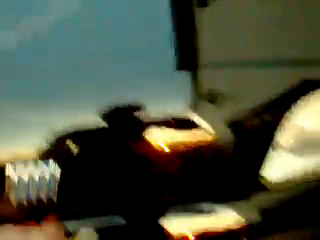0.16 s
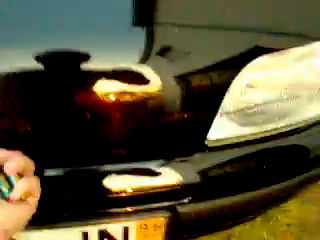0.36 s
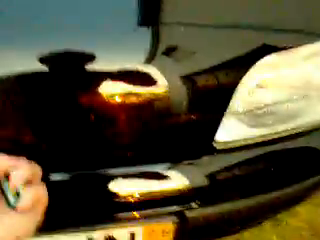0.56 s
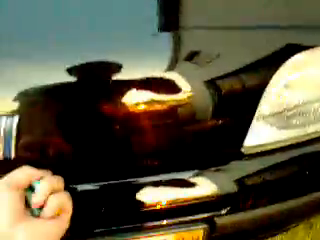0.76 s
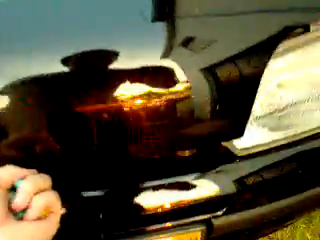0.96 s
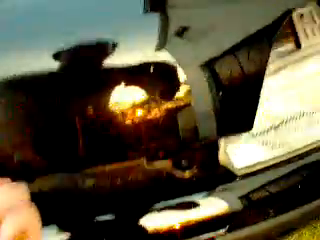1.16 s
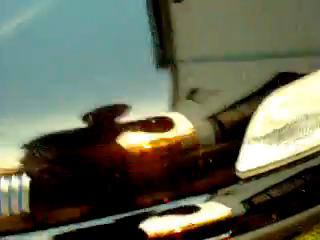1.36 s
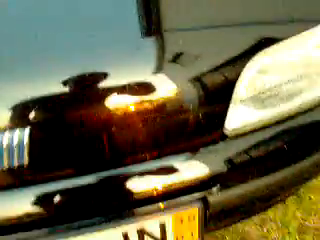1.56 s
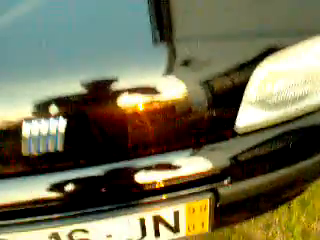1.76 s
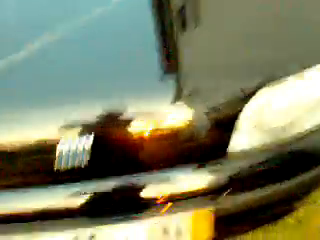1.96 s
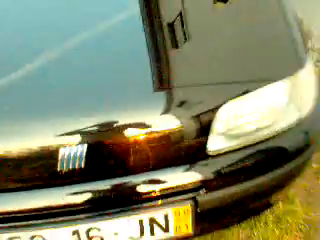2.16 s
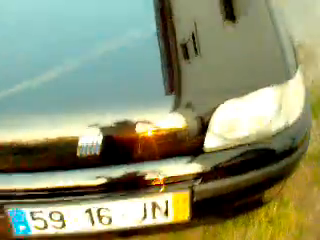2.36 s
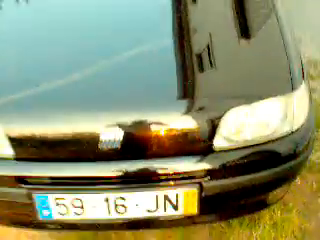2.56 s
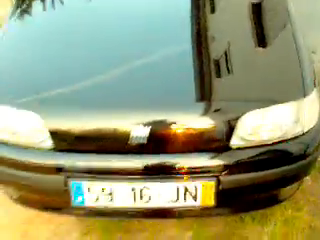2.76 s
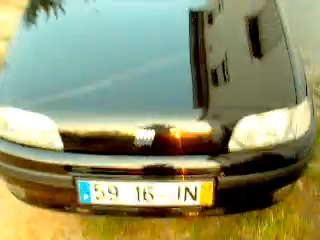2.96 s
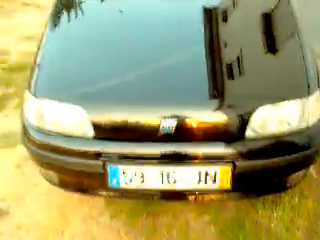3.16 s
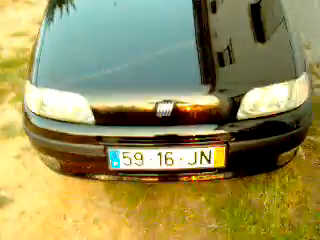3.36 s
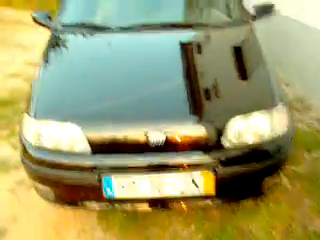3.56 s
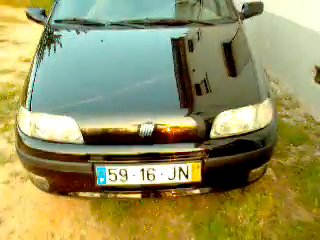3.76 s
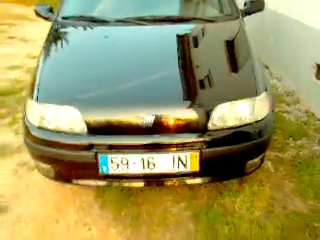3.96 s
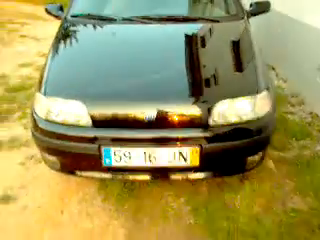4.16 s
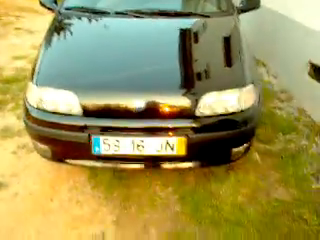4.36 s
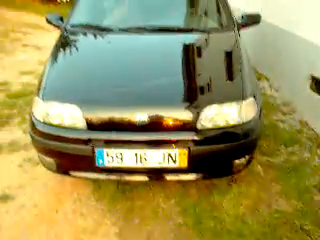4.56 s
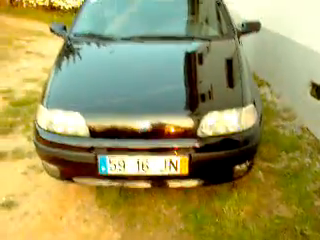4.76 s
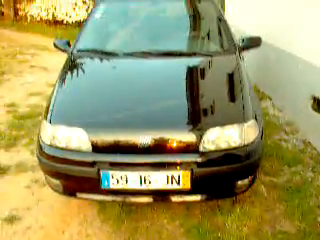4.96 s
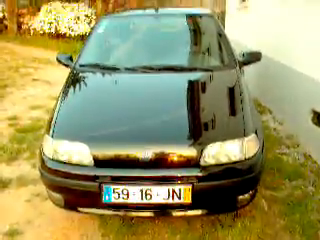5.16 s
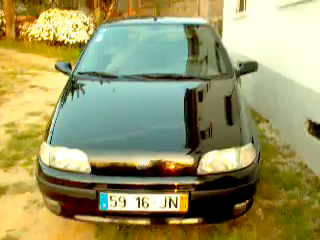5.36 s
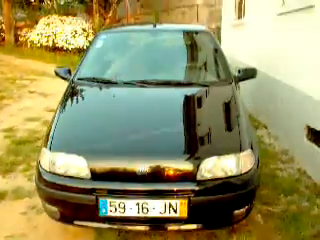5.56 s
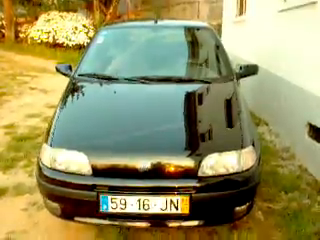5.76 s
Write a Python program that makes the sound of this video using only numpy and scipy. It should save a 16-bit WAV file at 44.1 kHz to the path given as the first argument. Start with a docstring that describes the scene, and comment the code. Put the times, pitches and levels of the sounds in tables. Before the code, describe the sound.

An outdoor scene heard through a small, band-limited hand-held microphone with steady dull hiss, low air rumble and sparse tiny electrical ticks. The start is nearly quiet, with a very faint touch of the bonnet. At about 0.5 s a light metallic knock comes from the latch, with a softer one near 0.75 s, leading straight into a heavy, hollow sheet-metal thud at 0.84 s. At 1.17 s a second deep thump lands, followed at 1.25 s by the loudest slam: bright, gritty latch clash, rattling car front, harshly overloaded. The lid bounces about five times, ever quicker and duller, settling by roughly 1.8 s. Rumble drops. A faint plastic click falls at 2.26 s; faint grass crackles around 2.5 to 3.3 s accompany small clicks, clustered near 3.3 s. At 4.54 s one loud, dry plastic snap cuts through. A last faint click comes at 5.6 s, over hiss.

```python
"""Outdoors, small hand-held camera microphone: a steel car bonnet is lowered onto its catch, knocks twice,
then is pressed shut with a double slam that overloads the input; the lid chatters to rest in quicker bounces.
Then the camera's case clicks in the hand, later once sharply; shoes step back over dry grass (swells of crackle).
Throughout lie a low outdoor rumble (coloured noise), narrow-band hiss and faint electrical ticks.
Bonnet, latch and case are sums of dying modes, with dying noise for their loose parts."""
import sys
import numpy as np
from scipy import signal
from scipy.fft import rfft, irfft, next_fast_len
from scipy.io import wavfile

SR = 44100
rng = np.random.default_rng(int(sys.argv[2]) if len(sys.argv) > 2 else 0)


def inscribe(sig):
    """Save sig as 16-bit PCM at rate SR to the path in sys.argv[1].

    A 1-D sig is mono; a 2-D sig holds one channel per row.
    Samples are clipped to [-1, 1] before scaling.
    """
    pcm = np.round(np.clip(np.atleast_2d(sig).T, -1, 1) * 32767)
    wavfile.write(sys.argv[1], SR, pcm.astype(np.int16))


N = 256662

# Blows on the bonnet, the first row only a faint hum of the panel at the very start [t/s, strength/dB, f
# excited by the edge/Hz, metal contact/dB, weight/dB, f excited by the weight/Hz, lid swing/dB]; metal, weight
# and swing are relative to strength
BLOWS = [(.005, -41.5, 226, -10, -4, 300, -9), (0.5174, -24.5, 330, 4.5, -1.5, 313, -23),
         (0.754, -26, 210, -37, -5.5, 300, -26), (.815, -29, 370, -27.5, -6, 450, -19),
         (0.8403, -8, 467, -4, -6, 380, -22), (1.104, -43, 606, 3.5, 2, 697, -8),
         (1.170, -8, 410, -12, 5, 202, -9.5), (1.246, 1, 980, 1, 3, 502, 8.5)]
# Modes of the bonnet panel [f/Hz, level/dB, t60/s]
PANEL_MODES = [(128, -13.5, 0.2), (157.3, 1.5, 0.23), (200.1, 2, 0.37), (233, -5.5, 0.57), (310, 0.5, 0.48),
               (332.8, -3.5, 0.37), (379.2, 1, 0.23), (420, -18.5, 0.58), (462.4, 2, 0.14),
               (516.5, -12, 0.41), (630, -4.5, 0.068), (738, -2, 0.074), (864, -8, 0.17), (995.5, -6, 0.14),
               (1067, -14, 0.093)]
# The whole lid bouncing on its rubber stops [f/Hz, level/dB, t60/s]
LID_MODES = [(30.33, -7, 0.4), (69.4, 2, 0.087)]
# Modes of the steel latch and its striker [f/Hz, level/dB, t60/s]
LATCH_MODES = [(1524, -3, 0.08), (1752, -4, 0.28), (2080, -13.5, 0.09), (2180, -13, 0.088),
               (2687, 6, 0.062), (3014, -15.5, 0.44), (3070, 8, 0.049), (3403, 12.5, 0.034),
               (3760, -8, 0.072), (3620, -9.5, 0.032)]
# Rattle of the car's front, relative spectrum [f/Hz, level/dB per Hz]
RATTLE_SPECTRUM = [(40, -2.5), (130, -2), (300, -0.5), (520, 2.5), (800, -11.5), (1050, -4), (1350, -33.5),
                   (2200, -29.5), (4000, -39)]
# How fast that rattle dies [f/Hz, t60/s]
RATTLE_DECAY = [(100, 0.44), (280, 0.53), (500, 0.16), (800, 0.24), (1800, 0.19), (4000, 0.14)]
# Grating of striker on latch, relative spectrum [f/Hz, level/dB per Hz]
CLASH_SPECTRUM = [(200, -23.5), (700, 20.5), (1050, 13.5), (1400, 9.5), (1850, 7.5), (2200, 1.5), (2800, 5),
                  (3500, 2.5), (4200, -4.5)]
# How fast the grating dies [f/Hz, t60/s]
CLASH_DECAY = [(700, 0.13), (4000, 0.13)]
# Clicks of the camera case in the hand [t/s, level/dB, brightest f/Hz]
CLICKS = [(2.263, -34.5, 610), (2.992, -36, 2100), (3.2841, -27, 1540), (3.332, -31, 1300),
          (3.3517, -24, 1100), (4.536, -6.5, 863), (5.610, -32, 2980)]
# Modes of the stiff plastic case [f/Hz, level/dB, t60/s]
CASE_MODES = [(510, -7, 0.024), (724, -4, 0.05), (893, -1, 0.01), (994, 3, 0.024), (1447, -1, 0.025),
              (1714, 3.5, 0.0093), (2020, 2, 0.0066), (2700, 4, 0.0087), (2930, -5, 0.0071),
              (3580, -1.5, 0.014)]
# Loose parts in the case, relative spectrum [f/Hz, level/dB per Hz]
BUZZ_SPECTRUM = [(150, -26), (400, -18), (850, 4.5), (1300, -9), (2000, -2.5), (4000, -21.5)]
# Shoes on soil and dry grass [t of the middle/s, level/dB, half length/s, brightest f/Hz]
SCUFFS = [(2.55, -53.5, 0.63, 544), (2.774, -43, 0.014, 2600), (2.88, -47, 0.031, 1020),
          (3.003, -52, 0.072, 540), (3.326, -39, 0.0088, 1050)]
# Dry grass, relative spectrum [f/Hz, level/dB per Hz]
GRASS_SPECTRUM = [(200, -1), (500, 2), (1050, -9), (1500, -15), (2900, -5), (4000, -13)]
# The clearest electrical ticks of the recorder [t/s]; fainter ones fall at random
CLEAR_TICKS = [0.186, .44, 1.91, 2.487, 3.116, 3.641, 4.17, 4.986, 5.232]
# Course of air and handling rumble on the microphone, before a common lift [t/s, level/dB]
RUMBLE_COURSE = [(0, -39.5), (1.2, -34.5), (2.2, -46), (5.8, -48)]
# That rumble, relative spectrum [f/Hz, level/dB per Hz]
RUMBLE_SPECTRUM = [(8, 8.5), (25, 4), (55, 6.5), (90, -2), (140, -10), (300, -16), (700, -41),
                   (2000, -39.5)]
# Preamplifier hiss, relative spectrum [f/Hz, level/dB per Hz]
HISS_SPECTRUM = [(30, 5.5), (300, 4), (600, 2.5), (1200, 0), (2500, 0), (4100, -1.5)]

# The lid's weight follows its edge: later and with less metal in it
FOLLOW_S, FOLLOW_METAL_DB = .014, -6.5
SWING_LAG_S = .03  # from a blow until the lid bottoms on its rubber stops
RATTLE_DB, RATTLE_PER_METAL = -1, 0.35  # rattle re strength; dB more for each dB of metal contact
# The bounces after the last blow
BOUNCE_S, BOUNCE_SHRINK = .048, .84  # first flight, each flight over the one before
BOUNCE_DB, BOUNCE_FADE_DB, BOUNCE_FADE_POWER = -6.5, 11.5, 2.43  # first, loss by the last, how late it comes
BOUNCE_METAL_DB, BOUNCE_METAL_FADE_DB = 0.5, 29.5  # metal contact of the first, its loss by the last
BOUNCE_HZ, BOUNCE_SWING_DB = 163.5, -10  # most excited frequency, lid swing re strength
# The camera case, levels re the click
GIVE_S, GIVE_DB = .006, -24.5  # it gives a little before it snaps
CRACK_DB, CRACK_HZ = -5, 1920  # its seam cracks with every snap
CHATTER_S, CHATTER_DB, CHATTER_HZ = .0053, -18, 3000  # then its parts chatter: spacing, level, middle pitch
RUB_DB, RUB_S, RUB_LAG_S = -22, 0.014, 0.0098  # the hand rubs around each click: level, half length, lag
TICK_DB, FAINT_TICK_DB = -27.5, -28.5
BAND_HZ, TOP_HZ = 4070, 15900  # upper edges: of the narrow band, and after the second clipping


def bonnet():
    """Each blow lands edge first, then with the lid's weight, and swings the lid; the last one bounces."""
    out = np.zeros(N)
    t = np.arange(SR * 3 // 4) / SR
    rise = 1 - np.exp(-t / 0.0005)
    # the first loud swing drains quickly into the car body
    shape = rise * amp(5.1 * np.exp(-t / 0.019) - 1.5)
    swing = sum(amp(db - 60 * t / t60) * np.sin(2 * np.pi * hz * t) for hz, db, t60 in LID_MODES)
    for s, db, edge_hz, metal_db, weight_db, weight_hz, swing_db in BLOWS:
        edge = contact(db, edge_hz, metal_db, t)
        weight = contact(db + weight_db, weight_hz, metal_db + FOLLOW_METAL_DB, t)
        add(out, s, shape * edge)
        add(out, s + FOLLOW_S, shape * weight)
        add(out, s + SWING_LAG_S, shape * amp(db + swing_db) * swing)
    for s, db, metal_db in bounces(count=5):
        landing = contact(db, BOUNCE_HZ, metal_db, t)
        add(out, s, shape * (landing + amp(db + BOUNCE_SWING_DB) * swing))
    return out


def contact(db, centre_hz, metal_db, t):
    """One contact rings the panel, shakes the front of the car and clashes the latch."""
    panel = ring(PANEL_MODES, centre_hz, focus_db=14.5, octaves=0.22, t=t)
    rattle_db = RATTLE_DB + RATTLE_PER_METAL * metal_db
    rattle = amp(rattle_db) * dying_noise(RATTLE_SPECTRUM, RATTLE_DECAY, t)
    # the striker meets the latch at a new spot each time, and grates as it does
    steel = ring(LATCH_MODES, rng.uniform(2000, 3800), focus_db=-2.5, octaves=0.17, t=t)
    grating = dying_noise(CLASH_SPECTRUM, CLASH_DECAY, t)
    clash = amp(metal_db) * (amp(-12) * steel + amp(-1) * grating)
    return amp(db) * (panel + rattle + clash)


def bounces(count):
    """Rows (t/s, strength/dB, metal/dB): the latched lid bounces ever faster and more softly."""
    k = np.arange(count)
    when = BLOWS[-1][0] + np.cumsum(BOUNCE_S * BOUNCE_SHRINK ** k)
    spent = (k / (count - 1)) ** BOUNCE_FADE_POWER
    strength_db = BOUNCE_DB - BOUNCE_FADE_DB * spent
    metal_db = BOUNCE_METAL_DB - BOUNCE_METAL_FADE_DB * spent
    return zip(when, strength_db, metal_db)


def case_clicks(count=3):
    """Under the rubbing hand the case gives, snaps, and chatters a few times."""
    out = np.zeros(N)
    t = np.arange(SR // 6) / SR
    around = t - t.mean()
    for s, db, centre_hz in CLICKS:
        add(out, s - GIVE_S, amp(db + GIVE_DB) * snap(centre_hz, t))
        crack = amp(CRACK_DB) * snap(CRACK_HZ, t)
        add(out, s, amp(db) * (snap(centre_hz, t) + crack))
        for k in range(count):
            chatter_hz = CHATTER_HZ * 2 ** rng.normal(0, 0.69)  # spread in octaves
            add(out, s + (k + 1) * CHATTER_S, amp(db + CHATTER_DB) * snap(chatter_hz, t))
        rub = np.exp(-.5 * (around / RUB_S) ** 2) * noise(BUZZ_SPECTRUM, len(t))
        add(out, s + RUB_LAG_S + around[0], amp(db + RUB_DB) * rub)
    return out


def snap(centre_hz, t):
    """Stiff plastic: short modes and a faint buzzing tail."""
    modes = ring(CASE_MODES, centre_hz, focus_db=16, octaves=0.25, t=t)
    return modes + amp(-6.5 - 60 * t / 0.039) * noise(BUZZ_SPECTRUM, len(t))


def steps():
    """Soft swells of crackle: dull where the sole meets soil, bright where it brushes stalks."""
    out = np.zeros(N)
    t = np.arange(-SR // 2, SR // 2) / SR
    for s, db, length, centre_hz in SCUFFS:
        # about 2000 random impulses a second
        stalks = rng.standard_normal(len(t)) * (rng.random(len(t)) < 2000 / SR)

        def grass(hz):
            bump = np.exp(-.5 * (np.log2((hz + 1) / centre_hz) / 0.28) ** 2)
            return amp(along(GRASS_SPECTRUM, hz) + 12.5 * bump) * (hz < BAND_HZ)

        crackle = unit(filtered(stalks, grass))
        swell = np.exp(-.5 * (t / length) ** 2)
        add(out, s + t[0], amp(db) * swell * crackle)
    return out


def ticks(count=8):
    """Small voltage steps in the recorder that leak away within a few milliseconds."""
    out = np.zeros(N)
    t = np.arange(SR // 50) / SR
    step = np.clip(1 - t / 0.0051, 0, 1) ** 2
    for s in CLEAR_TICKS:
        add(out, s, amp(TICK_DB) * step)
    for s in rng.uniform(0, N / SR, count):
        add(out, s, amp(FAINT_TICK_DB) * step)
    return out


def background():
    """Air rumbling on the microphone, and even preamplifier hiss: two coloured noises."""
    rumble_db = np.interp(np.arange(N) / SR, *np.transpose(RUMBLE_COURSE)) + 3.0
    rumble = amp(rumble_db) * noise(RUMBLE_SPECTRUM, N)
    hiss = amp(-42) * noise(HISS_SPECTRUM, N)
    return rumble + hiss


def ring(modes, centre_hz, focus_db, octaves, t):
    """Struck modes, starting at rms 1; contact favours those near centre_hz, or spares them if focus_db < 0."""
    hz, db, t60 = np.transpose(modes)[:, :, None]
    favour = focus_db * np.exp(-.5 * (np.log2(hz / centre_hz) / octaves) ** 2)
    gain = amp(db + favour + rng.standard_normal(hz.shape))  # no two strikes quite alike
    partials = gain * amp(-60 * t / t60) * np.sin(2 * np.pi * hz * t)
    return np.sum(partials, axis=0) / np.sqrt(np.sum(gain ** 2) / 2)


def dying_noise(spectrum, decay, t):
    """Countless close modes: noise in which each frequency dies at its own speed."""
    hz, when, z = signal.stft(noise(spectrum, len(t)), SR, nperseg=256)
    fade = amp(-60 * when / along(decay, hz)[:, None])
    return signal.istft(z * fade, SR, nperseg=256)[1][:len(t)]


def noise(spectrum, size):
    """Coloured noise of rms 1."""
    return unit(filtered(rng.standard_normal(size), lambda hz: amp(along(spectrum, hz))))


def filtered(x, response):
    """x times a response of frequency, padded so that its tail does not wrap round."""
    m = next_fast_len(len(x) + SR // 4)
    return irfft(rfft(x, m) * response(np.fft.rfftfreq(m, 1 / SR)), m)[:len(x)]


def along(points, hz):
    """Read (f/Hz, value) points on a log frequency axis."""
    f, v = np.transpose(points)
    return np.interp(np.log(hz + 1), np.log(f + 1), v)


def amp(db):
    """Level in dB to amplitude."""
    return 10 ** (np.asarray(db) / 20)


def unit(x):
    """Scale to rms 1."""
    return x / np.sqrt(np.mean(x ** 2) + 1e-20)


def add(track, s, sound):
    """Mix a sound into the track from time s."""
    part = track[round(s * SR):][:len(sound)]
    part += sound[:len(part)]


def scene():
    """All sources summed at the one microphone."""
    return (bonnet() + case_clicks() + steps() + ticks() + background())[None]


def clipped(x, top, hardness):
    """Saturation with a rounded knee."""
    return x / (1 + np.abs(x / top) ** hardness) ** (1 / hardness)


def record(dry):
    """The input overloads, is cut to a narrow band, and its overshoots clip again, slightly off zero."""
    loud = clipped(dry[0], top=amp(-3.0), hardness=44)
    # above the band the level falls 1 dB every 3 Hz, by 120 dB at most
    narrow = filtered(loud, lambda hz: amp(-np.clip((hz - BAND_HZ) / 3, 0, 120)))
    flat = np.clip(narrow - .033, -.7, .7)
    return filtered(flat, lambda hz: hz < TOP_HZ)[None]


dry = scene()
out = record(dry)
inscribe(out)
```